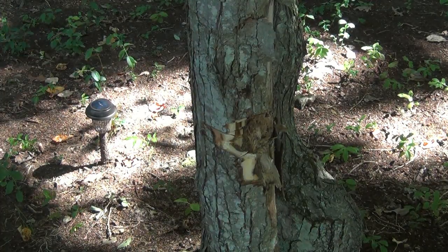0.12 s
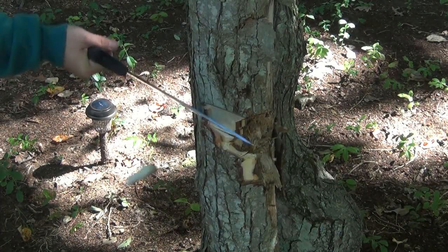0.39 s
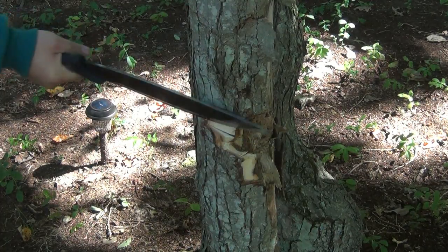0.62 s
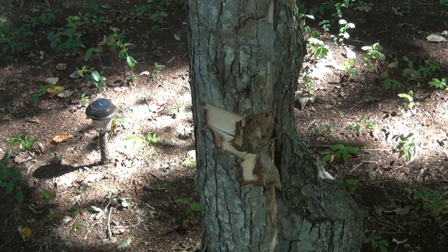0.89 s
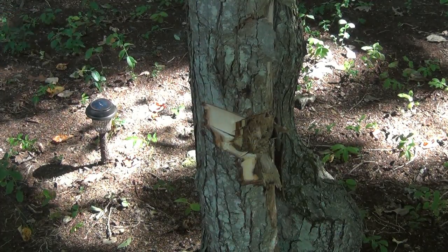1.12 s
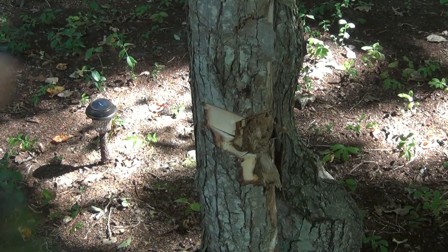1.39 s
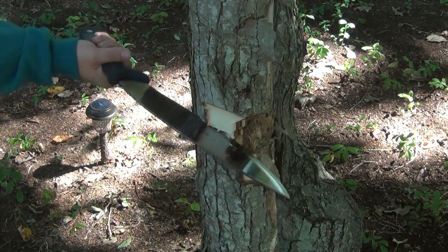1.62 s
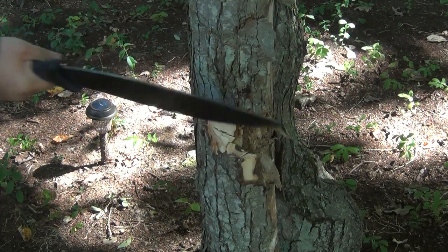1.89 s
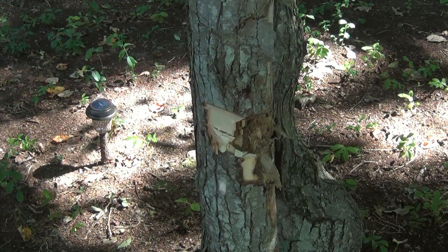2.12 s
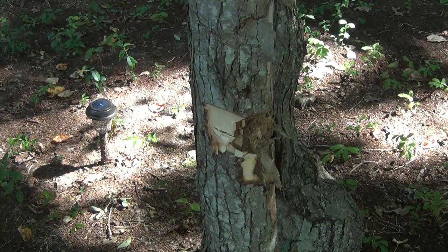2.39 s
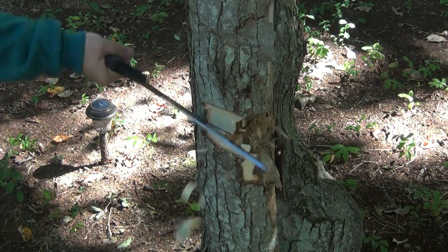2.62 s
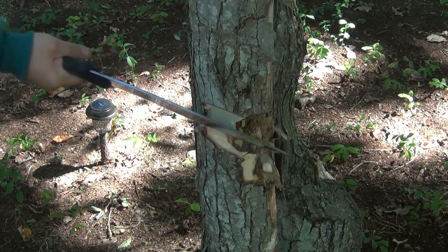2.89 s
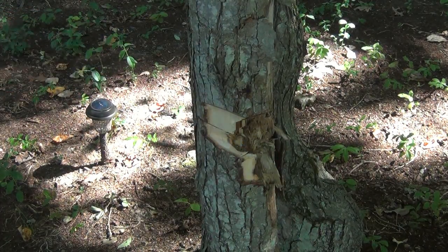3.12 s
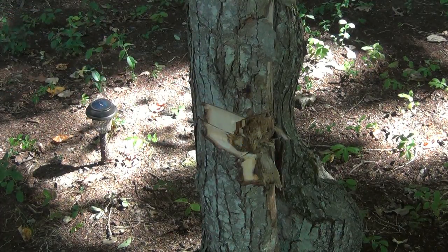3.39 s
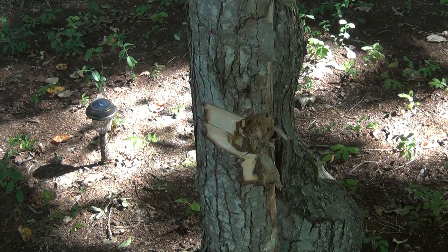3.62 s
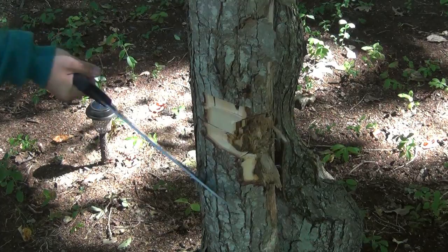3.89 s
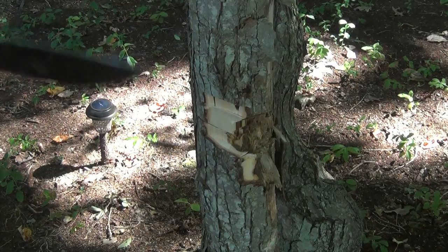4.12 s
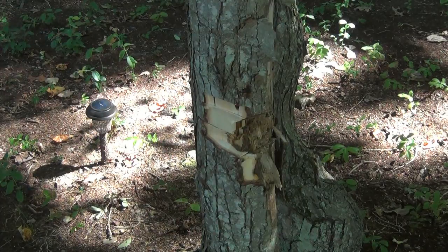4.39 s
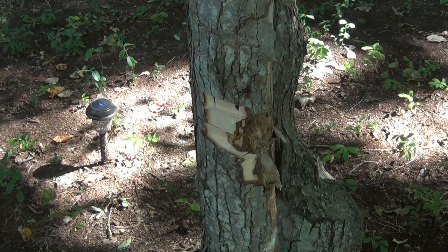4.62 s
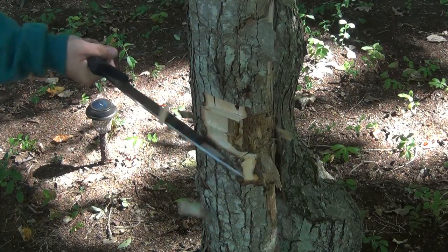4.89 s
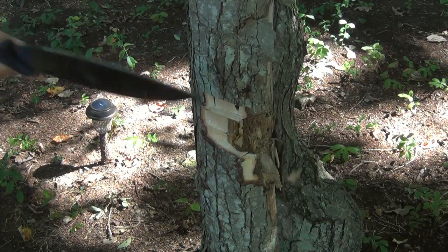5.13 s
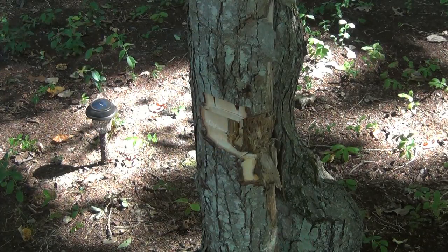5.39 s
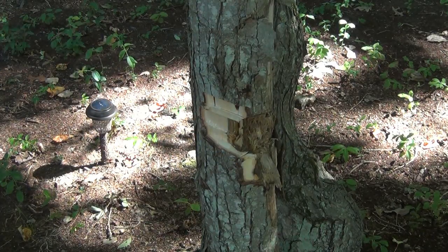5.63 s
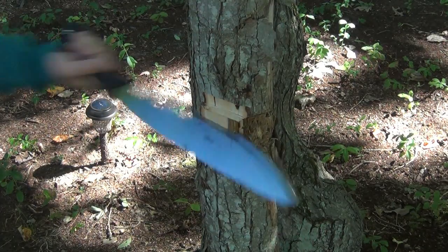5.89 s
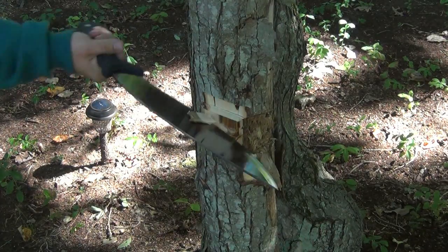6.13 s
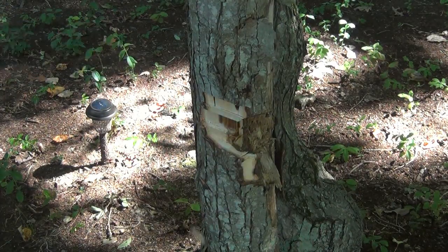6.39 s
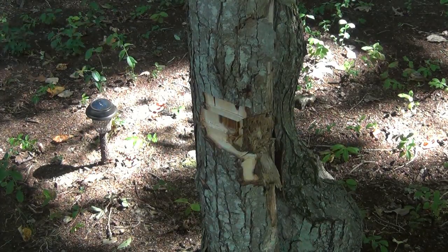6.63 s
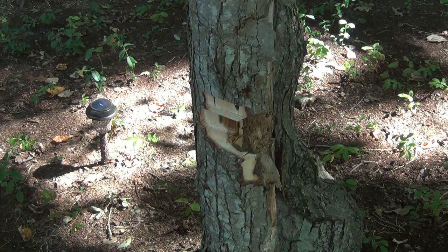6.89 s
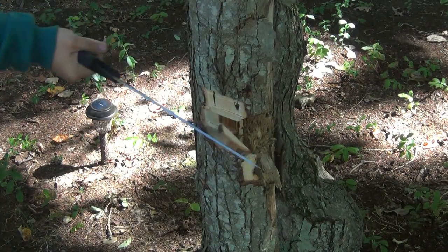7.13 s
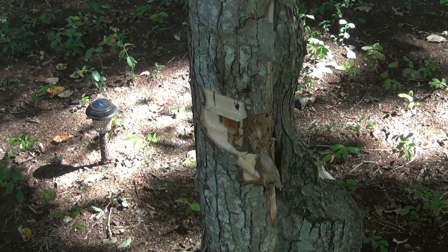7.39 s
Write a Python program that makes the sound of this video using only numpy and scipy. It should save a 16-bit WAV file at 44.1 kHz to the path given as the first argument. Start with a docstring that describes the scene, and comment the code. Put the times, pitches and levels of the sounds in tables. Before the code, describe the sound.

Seven loud, evenly paced chops land in solid wood, slightly right of centre, heard from two metres by a small stereo microphone. The thuds are full and woody, some brighter and crackling, a few with a faint metallic blade ping. Small chips patter, click and rustle in leaf litter after each. Behind are soft forest air, light wind puffs, faint distant hums and, near the end, a far crow.

```python
"""A clearing in the woods: still air, puffs of wind and distant hums, heard by a small stereo microphone.
Two metres away a heavy machete chops seven times into a standing trunk: filtered noise and a tone swish in,
noise bursts crack, and delayed sine waves ring the trunk. A noise echo from the trees answers each blow.
Splinters snap, chips knock and click onto dry leaves as short bursts, and the blade sometimes pings.
Near the end a far crow caws in rattling tone and noise."""
import sys
import numpy as np
from scipy import signal
from scipy.io import wavfile
from scipy.ndimage import uniform_filter1d

SR = 44100
rng = np.random.default_rng(int(sys.argv[2]) if len(sys.argv) > 2 else 0)


def natural_amplitude(level_db):
    """Convert a level in decibels to a linear amplitude factor, elementwise."""
    exponent = np.asarray(level_db, float) / 20
    return 10 ** exponent


def store_pcm(level_fs):
    """Save levels as 16-bit WAV."""
    pcm = np.round(np.clip(level_fs, -1, 1) * 32767).astype(np.int16)
    wavfile.write(sys.argv[1], SR, np.atleast_2d(pcm).T)


N = 331191
TIME = np.arange(N) / SR
SIDES = np.array([[1], [-1]])  # opposite signs for left and right
SWING = 8192  # samples in one swing of the blade
BEFORE_S = TIME[SWING - 1::-1]  # time left until the blade lands

# blows into the trunk: (time [s], thud level [dB], bite level [dB], splinter pitch [Hz], splinter level [dB])
BLOW_TABLE = [(0.432, -6.5, -19.5, 4730, -11.5), (1.558, -6.5, -61, 2920, -17),
              (2.707, -4.5, -15.5, 3400, -19), (3.837, -6, -21, 2640, -53), (4.942, -4.5, -17, 3450, -23.5),
              (6.032, -6, -31, 3390, -16.5), (7.076, -5.5, -16.5, 5950, -9.5)]


def unit(x):
    """Scale to rms 1."""
    return x / np.sqrt(np.mean(x ** 2))


def band(x, hz, octaves, order=2):
    """Band-pass around hz."""
    low = hz * 2. ** (-octaves / 2)
    high = min(hz * 2. ** (octaves / 2), SR / 2.05)
    return signal.sosfilt(signal.butter(order, (low, high), "band", fs=SR, output="sos"), x)


def walk(rate):
    """Slow random drift of rms 1, with about rate new values per second."""
    k = int(SR / rate)
    steps = np.repeat(rng.standard_normal(N // k + 1), k)
    return unit(uniform_filter1d(uniform_filter1d(steps, k), k)[:N])


def add(track, s, sound):
    """Mix a short sound in at time s."""
    i = int(s * SR)
    track[..., i:i + sound.shape[-1]] += sound[..., :N - i]


def hump(s, half):
    """A smooth swell around time s."""
    return np.exp(-((TIME - s) / half) ** 2)


def shower():
    """How thickly chips are landing, about 0-1: rising after each blow, then thinning out."""
    peak_s = 0.15
    since = np.maximum(TIME - np.array(BLOW_TABLE)[:, :1], 0) / peak_s
    return (since * np.exp(1 - since)).sum(axis=0)


def still_air():
    """The quiet of the woods: half-octave noise bands that drift; far hiss stays smooth, the bass wanders."""
    # sound of the calm woods before scaling: (frequency [Hz], relative level [dB per Hz])
    air_spectrum = [(12, -38), (20, -12), (108, 4.5), (224, -6), (599, -2), (772, -4.5), (1430, -5.5),
                    (2370, -12.5), (4790, -15), (5360, -22), (7730, -18), (14300, -33), (16500, -29)]
    hz_points, db_points = np.transpose(air_spectrum)
    air, swell = 0, walk(1.0)
    for hz in 22 * 2 ** np.arange(0, 9.6, .5):
        mid, side = (unit(band(rng.standard_normal(N), hz, 0.49)) for _ in range(2))
        db = np.interp(np.log(hz), np.log(hz_points), db_points) + 10 * np.log10(hz)
        db = db + (.8 * swell + 1.5 * walk(3)) * min(1, 1600 / hz + .25)
        air = air + natural_amplitude(db) * (mid + np.clip(hz / 1500, .3, .8) * side * SIDES)
    return natural_amplitude(-53.5) * unit(air)


def wind():
    """Low noise of moving air on the microphone: a faint constant breath and two puffs."""
    # puffs of wind: (time [s], half length [s], level [dB])
    puffs = [(0.05, 0.55, -63), (4.76, 0.18, -54)]
    calm_db = -67
    strength = natural_amplitude(calm_db) + sum(natural_amplitude(db) * hump(s, half) for s, half, db in puffs)
    rumble = natural_amplitude(3.5 * walk(25)) * unit(band(rng.standard_normal((3, N)), 60, 2.6))
    return strength * (rumble[0] + 0.45 * rumble[1:])


def distant_hums():
    """Far low tones that swell and fade, wavering in pitch and level."""
    # distant hums: (time [s], half length [s], centre pitch [Hz], mean level [dB])
    hum_table = [(0.5, .6, 168, -58), (2.4, .45, 165, -60), (3.5, .6, 163, -55), (3.6, .35, 83, -58),
                 (4.0, .6, 121, -56), (5.2, .3, 118, -58), (5.75, .3, 120, -55), (6.9, .4, 119, -54),
                 (1.2, .4, 172, -60)]
    out = np.zeros(N)
    for s, half, hz, db in hum_table:
        tone = np.sin(2 * np.pi * np.cumsum(hz * (1 + 0.008 * walk(4))) / SR)
        out += hump(s, half) * tone * natural_amplitude(db + 2.5 * walk(9))
    return out


def leaf_rustle():
    """Leaves rustle under the falling chips: mid-band noise that follows the shower unevenly."""
    rustle_db = -51
    noise = unit(band(rng.standard_normal(N), 503, 1.9))
    return natural_amplitude(rustle_db) * shower() * natural_amplitude(3.4 * walk(40)) * noise


def woods():
    """The place itself: still air, wind, hums and leaf rustle."""
    return still_air() + wind() + distant_hums() + leaf_rustle()


def burst(noise, hz, octaves, ms):
    """Fibres break: coloured noise whose amplitude decays by e in ms, with energy in step with its length."""
    ms = max(ms, .3)
    x = band(noise * np.exp(-TIME[:len(noise)] * 1000 / ms), hz, octaves)
    return x * np.sqrt(ms * SR / 8000 / np.sum(x ** 2))


def snaps():
    """Splinters and leaves snap: a few fibres part, the first sharpest; the trees hear each as a clap."""
    # the clearest splinters and leaf snaps, before scaling:
    # (time [s], snap level [dB], fizz level [dB], decay time [ms])
    snap_table = [(0.03, -35, -51, 2.9), (0.479, -18.5, -31, 3.9), (0.613, -30, -30, 1.8),
                  (0.7845, -34.5, -42, 7), (1.3236, -35.5, -45.5, 3.3), (1.9765, -55, -44.5, 3.5),
                  (2.001, -58, -44.5, 3), (2.356, -38, -43.5, 3.2), (2.8983, -29, -62, 1.5),
                  (2.974, -41, -49, 36), (3.0055, -19.5, -38, 1.3), (3.0693, -30, -53, 2.8),
                  (3.14, -27, -48, 1.7), (3.184, -28.5, -49, 0.92), (3.253, -28, -43, 8.2),
                  (3.283, -35.5, -52, 8.6), (3.316, -38, -48, 5.1), (3.3741, -35.5, -45.5, 6.2),
                  (3.514, -33.5, -65, 1.7), (3.8994, -18.5, -22, 5.1), (4.1384, -28, -32, 11),
                  (4.275, -53, -50, 13), (4.342, -39, -71, 1.8), (4.428, -48, -48, 3.1),
                  (4.993, -24, -28, 4.6), (5.2222, -35, -40, 8.1), (5.29, -34, -43, 1.8),
                  (5.429, -40.5, -44.5, 5.6), (5.5055, -37, -48, 3.5), (6.0842, -9, -26, 7.3),
                  (6.438, -44, -43, 2), (6.692, -45, -39.5, 2.9), (7.1227, -19.5, -30, 18),
                  (7.271, -33, -38.5, 4.7), (7.4809, -39, -41, 1.1)]
    split_db, first_db = 5, 7  # unevenness of the fibres, lift of the first one
    out, sent = np.zeros((2, N)), np.zeros(N)
    clap = np.zeros((2, 4096))
    clap[:, 0] = 1

    def snap_and_fizz(source):
        snap = natural_amplitude(snap_db) * burst(source[0], 3180, 1.88, ms)
        return snap + natural_amplitude(fizz_db + 5) * burst(source[1], 8900, 0.98, ms)

    for s, snap_db, fizz_db, ms in snap_table:
        parting = np.repeat(np.minimum(rng.exponential(size=512), 2), 8)
        fibres = rng.standard_normal((2, 4096)) * natural_amplitude(split_db * parting)
        fibres[:, :8] *= natural_amplitude(first_db)
        place = natural_amplitude(3.8 * rng.standard_normal() * SIDES)  # each lands somewhere left or right
        add(out, s, snap_and_fizz(fibres) * place)
        add(sent, s, natural_amplitude(-16.5) * snap_and_fizz(clap))
    return out, sent


def scatter(per_s):
    """Lone clicks of uneven size that come in clumps."""
    clumps = per_s * natural_amplitude(9 * walk(25))
    clicks = rng.random((2, N)) < clumps / SR
    size = natural_amplitude(np.minimum(4 * rng.exponential(size=(2, N)), 12))
    return clicks * size * rng.standard_normal((2, N))


def leaf_crackle():
    """Bark, leaf and dust ticks at all times, thicker in each shower: band-passed lone clicks."""
    # ticks of coarse bark, leaves, fine dust: (centre frequency [Hz])
    tick_bands = 4630, 7300, 12900
    ticks_per_s, shower_ticks_per_s, tick_db = 40, 240, -45  # rates before clumping, shared by the bands
    rate = (ticks_per_s + shower_ticks_per_s * shower()) / len(tick_bands)
    crackle = sum(band(scatter(rate), hz, 0.92) * np.sqrt(8000 / hz) for hz in tick_bands)
    return natural_amplitude(tick_db) * (crackle + 1.1 * crackle[::-1])  # each side also hears the other's ticks


def patter():
    """Small chips patter down in each shower: clicks through narrow wooden resonances."""
    per_s, patter_db = 90, -20
    clicks = scatter(per_s * shower())
    return natural_amplitude(patter_db) * (band(clicks[0], 650, 0.26) + 0.75 * band(clicks[1], 468, 0.26))


def swish(db, hz, ms, sudden, whistle_db):
    """Air sheds eddies off the edge as noise and a climbing edge tone, shaded by the trunk at the end."""
    impact_hz, rise_hz_per_ms = 1656, 13  # whistle climbs over the last 60 ms as the blade speeds up
    shade = 1 - 0.76 * np.exp(-BEFORE_S / 0.0077)
    rise = np.exp(-(BEFORE_S * 1000 / ms) ** sudden) * shade
    noise = rng.standard_normal(SWING)
    eddies = unit(band(noise, hz, 4.2 / sudden) + 0.24 * band(noise, 1560, 3.3))
    tone_hz = impact_hz - rise_hz_per_ms * np.minimum(BEFORE_S * 1000, 60)
    tone_hz = tone_hz * (1 + 0.0415 * walk(201.3)[:SWING])
    whistle = np.sin(2 * np.pi * np.cumsum(tone_hz) / SR)
    return rise * (natural_amplitude(db) * eddies + natural_amplitude(whistle_db + 3.3 * walk(116)[:SWING]) * whistle)


def trunk(tilt_db, knock_db, boom_db):
    """Bending waves ring the trunk, low ones mostly late; where the blade lands changes each one's share."""
    # waves coming back along the trunk, before each blow's changes:
    # (pitch [Hz], relative level [dB], arrival of peak [ms], spread [ms])
    wave_table = [(1333, -4, 0.69, 1.23), (1792, -13, 1.5, 2.6), (684, -1.5, 6.1, 5.2),
                  (482.7, 5.5, 7.9, 1.11), (290, -0.5, 7.7, 4.9), (915, -3.5, 8.3, 2.8),
                  (1105, -6, 19.4, 0.69), (149.8, -4, 28.2, 9.8), (492.4, -6, 34, 9.5),
                  (394.2, -2, 36.8, 5.7), (228.5, -2.5, 44.4, 3.9), (34.7, -28.5, 22, 34),
                  (103.2, -2.5, 50.5, 14.2), (600, -14.5, 39.6, 2.8), (700, -8.5, 24.8, 4.1),
                  (692, -13.5, 45, 7.3), (391.2, -11.5, 57.3, 7.2), (112.8, -5, 64.6, 13.5),
                  (205.6, -4, 73, 2.96), (423, -19, 53, 33.4), (110.9, -14, 102, 11.7),
                  (100.35, -24.5, 67, 65)]
    knock_hz, boom_hz = 755, 105
    ms = TIME[:SR // 2] * 1000
    hz, db, late, width = (c[:, None] for c in np.transpose(wave_table))
    share_draw, side_draw, pitch_draw = rng.standard_normal((3, len(wave_table)))
    swell = np.exp((late / width) ** 2 * (np.log(ms / late + 1e-9) + 1 - ms / late))
    share = 1.5 * share_draw[:, None] + tilt_db * np.log2(hz / 300)
    share = share + knock_db * np.exp(-(np.log2(hz / knock_hz) / 0.39) ** 2)
    share = share + boom_db * (hz < 1.2 * boom_hz)
    hz = hz * (1 + .015 * pitch_draw[:, None] * hz / knock_hz)
    waves = natural_amplitude(db - 7.0 + share) * swell * np.sin(2 * np.pi * hz * ms / 1000)
    # waves leave the trunk at different spots, so each leans to one side
    return waves.sum(axis=0) + 0.15 * (side_draw @ waves) * SIDES


def crack(noise, bite_db, hz, splinter_db):
    """The edge bites, a splinter tears, fine fibres fizz, the gripped blade rings dully: noise bursts."""
    # thinner, higher splinters fizz more: -22 dB at 4 kHz, 8.5 dB more per octave
    fizz_db = -22 + 8.5 * np.log2(hz / 4000)
    bite = natural_amplitude(bite_db) * burst(noise[0], 1504, 2.26, 2.97)
    splinter = natural_amplitude(splinter_db) * burst(noise[1], hz, 0.83, 2.2)
    fizz = burst(noise[2], 10700, 0.52, 2.6)
    blade = 1.12 * burst(noise[0], 6570, 0.31, 4.0)
    return natural_amplitude(4.5) * (bite + splinter + natural_amplitude(fizz_db) * (fizz + blade))


def tear(db):
    """The wood goes on tearing round the buried edge: a flickering noise burst."""
    noise = burst(rng.standard_normal(SWING), 1050, 1.7, 20)
    return natural_amplitude(db - 20 + 4.1 * walk(120)[:SWING]) * noise


def chops():
    """Swish, thud in the trunk, crack and tear; far trees get the crack's colour as one clap."""
    # swing before each blow: (swish level [dB], swish pitch [Hz], swish rise [ms], suddenness [exponent],
    # whistle level [dB])
    stroke_table = [(-40.5, 1130, 35, 4.7, -33.5), (-36.5, 490, 32, 1.25, -55), (-44.5, 580, 30, 2.2, -51),
                    (-39.5, 690, 26, 1.3, -49), (-41.5, 480, 35, 1.7, -56), (-38.5, 850, 37, 1.6, -54),
                    (-44, 1400, 41, 4.3, -45)]
    # where the edge lands colours the thud: (brightness [dB per octave], knock [dB], boom [dB])
    landing_table = [(0, 2, 2), (0.5, 3.5, 0.5), (1.5, 0, 1.5), (1.3, -2, 0), (2, -5, 2), (0.4, -0.5, -1),
                     (0, 1, 1.5)]
    near, sent = np.zeros((2, N)), np.zeros(N)
    clap = np.zeros((3, SWING))
    clap[:, 0] = 1
    for blow, stroke, landing in zip(BLOW_TABLE, stroke_table, landing_table):
        s, thud_db, *edge = blow
        tilt_db, knock_db, boom_db = landing
        add(near, s - SWING / SR, swish(*stroke))
        add(near, s, natural_amplitude(thud_db) * trunk(tilt_db, knock_db, boom_db))
        add(near, s, natural_amplitude(1.5) * crack(rng.standard_normal((3, SWING)), *edge))
        add(near, s, tear(thud_db + 2.4 * tilt_db))
        far_thud = natural_amplitude(thud_db - 7 + 0.15 * knock_db) * burst(clap[0], 496, 2.52, 4.75)
        add(sent, s, crack(clap, *edge) + far_thud)
    return near, sent


def trees(x):
    """Near trunks answer densely but unevenly and fade band by band; the deep woods hang on faintly."""
    # echo of the trees: (frequency [Hz], relative level [dB], dense for [ms], then t60 [s])
    echo_table = [(153, -12.5, 109, 0.29), (357, -4, 13, 0.36), (600, -12, 60.7, 0.34),
                  (1340, -13.5, 34, 0.49), (2634, -11.5, 14.5, 0.49), (5040, -23, 55.5, 0.44),
                  (9200, -20, 26.4, 0.27), (14200, -41, 27, 0.28)]
    t = TIME[:SR]
    echo, trunks = 0, natural_amplitude(1.8 * walk(300)[:SR])
    onset = np.minimum(t / .005, 1)
    for hz, db, dense_ms, t60 in echo_table:
        mid, side = rng.standard_normal((2, SR))
        pair = band(mid + np.clip(hz / 5000, .15, .45) * side * SIDES, hz, 0.89)
        fade = 1000. ** (-np.maximum(t - dense_ms / 1000, 0) / t60)
        fade = fade + natural_amplitude(-25) * 1000. ** (-t / 1.94)  # deep woods
        echo = echo + natural_amplitude(db + 2.2 * walk(30)[:SR]) * pair * fade
    return natural_amplitude(-12.5) * signal.fftconvolve(np.atleast_2d(x), echo * trunks * onset, axes=1)[:, :N]


def knock(hz, ms):
    """A soft contact rings a small piece of wood briefly."""
    t = TIME[:4096] * 1000 / ms
    return t * np.exp(1 - t) * np.sin(2 * np.pi * hz * TIME[:4096])


def chip_knocks():
    """Chips knock on wood and ground, tip over and land again softer and lower; the trees hear the first."""
    # the clearest knocks, before scaling: (time [s], level [dB], pitch [Hz])
    knock_table = [(0.61, -38, 646), (0.746, -28.5, 605), (0.785, -31.5, 258), (0.808, -35.5, 617),
                   (0.847, -33.5, 600), (1.16, -36.5, 610), (1.2, -42, 600), (1.325, -43.5, 4360),
                   (1.85, -37.5, 480), (1.912, -38, 620), (1.975, -38, 620), (2.035, -43.5, 600),
                   (2.216, -38.5, 673), (2.286, -40, 644), (2.825, -32, 700), (2.883, -33, 620),
                   (2.918, -27.5, 439), (3.035, -35, 666), (3.072, -31.5, 384), (3.126, -35.5, 620),
                   (3.142, -36.5, 1050), (3.435, -40.5, 960), (3.639, -40, 430), (3.9, -17, 900),
                   (4.138, -31, 654), (4.195, -39, 656), (4.256, -36, 586), (4.992, -14, 1050),
                   (5.198, -30, 670), (5.222, -29.5, 437), (5.288, -35, 986), (5.327, -32.5, 598),
                   (5.387, -35.5, 410), (5.527, -35, 603), (6.085, -21, 996), (6.346, -31.5, 600),
                   (6.704, -38.5, 584), (7.275, -33, 418), (7.402, -35, 630), (7.454, -37, 630)]
    ms = 9.1
    bounce_s, bounce_db, bounce_pitch = 0.012, -13, 0.798  # mean delay, relative level, pitch ratio
    out, sent = np.zeros((2, N)), np.zeros(N)
    clap = np.zeros(4096)
    clap[0] = 1
    for s, db, hz in knock_table:
        scrape = burst(rng.standard_normal(4096), 1.3 * hz, 1.8, ms)
        add(out, s - .002, natural_amplitude(db) * (0.55 * knock(hz, ms / 2) + 0.71 * scrape))
        again = s + bounce_s * (.5 + rng.random())
        add(out, again, natural_amplitude(db + bounce_db) * knock(bounce_pitch * hz, ms / 2))
        add(sent, s, natural_amplitude(db - 15.0) * burst(clap, hz, 2.9, ms))
    return out, sent


def blade_pings():
    """The blade rings free: three decaying sine modes."""
    # modes of the blade: (pitch [Hz], relative level [dB], t60 [s])
    mode_table = [(5938, -9, .33), (6939, 0, .13), (10200, -12, .12)]
    # pings: (time [s], level [dB], lift of the modes above the lowest [dB])
    ping_table = [(3.004, -40.5, 5), (3.836, -38, -10), (3.898, -37, -8), (4.941, -26.5, -6)]
    out = np.zeros((2, N))
    t = TIME[:SR // 3]
    for s, db, upper_db in ping_table:
        for hz, mode_db, t60 in mode_table:
            level = natural_amplitude(db + mode_db + upper_db * (hz > mode_table[0][0]))
            add(out, s, level * np.sin(2 * np.pi * hz * t) * 1000. ** (-t / t60))
    return out


def crow():
    """Hoarse caws far off: an unsteady voice, rattling, mostly one throat resonance."""
    # caws, before the voice and noise are mixed: (start [s], length [s], level [dB], throat pitch [Hz])
    caw_table = [(5.723, 0.27, -53, 1467), (6.33, 0.31, -52, 1468), (6.743, 0.33, -56.5, 1714),
                 (6.76, 0.25, -56, 1426)]
    out = np.zeros(N)
    rattle = 1 + .4 * np.sin(2 * np.pi * 85 * TIME + 3 * walk(60))
    for s, length, db, hz in caw_table:
        shape = np.sin(np.pi * np.clip((TIME - s) / length, 0, 1)) ** 0.57
        voice = np.sin(2 * np.pi * np.cumsum(hz * (1 + 0.16 * walk(40))) / SR)
        breath = unit(band(rng.standard_normal(N), hz, .22))
        out += natural_amplitude(db) * shape * rattle * (.6 * voice + breath)
    return out


def scene():
    """The tree stands a little to the right, with debris, crow and woods around it."""
    near, chop_claps = chops()
    splinters, snap_claps = snaps()
    chips, knock_claps = chip_knocks()
    debris = splinters + chips + blade_pings() + leaf_crackle() + patter()
    tree = near + trees(chop_claps + snap_claps + knock_claps)
    lean = natural_amplitude(0.4 * -SIDES)  # quieter left, louder right
    return tree * lean + debris + crow() + woods()


def top_cut(x):
    """Nothing passes above the cut-off."""
    return signal.sosfilt(signal.butter(12, 16980, fs=SR, output="sos"), x)


def record(dry):
    """The small microphone rounds the loudest peaks and loses the very top."""
    rounded = np.tanh(0.86 * dry) / 0.73
    low_pass = signal.ellip(6, .3, 50, 15900, fs=SR, output="sos")
    heard = signal.sosfilt(low_pass, rounded)
    return top_cut(heard)


dry = scene()
out = record(dry)
store_pcm(out)
```